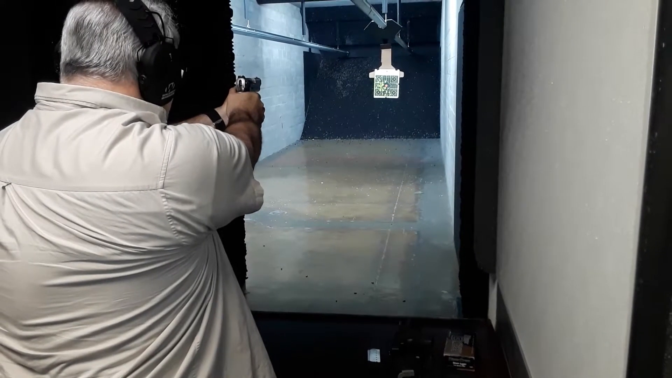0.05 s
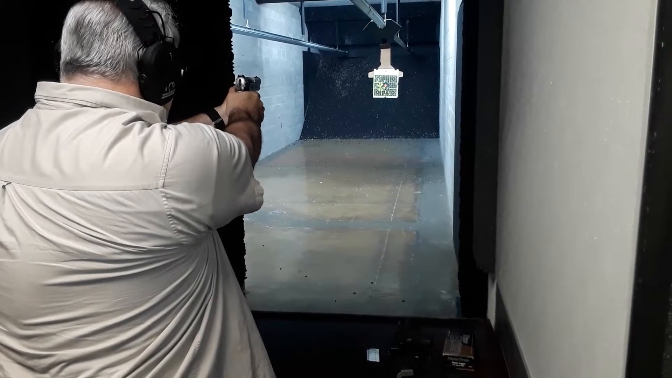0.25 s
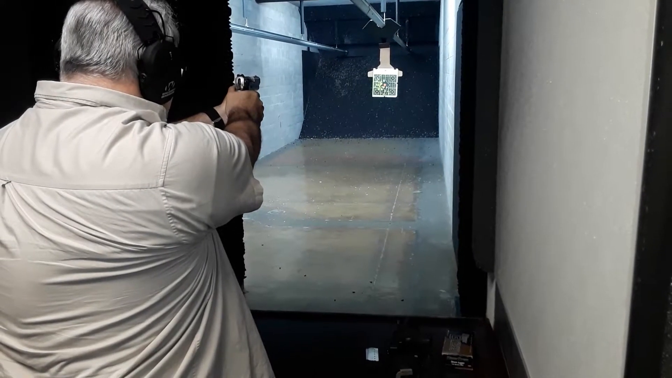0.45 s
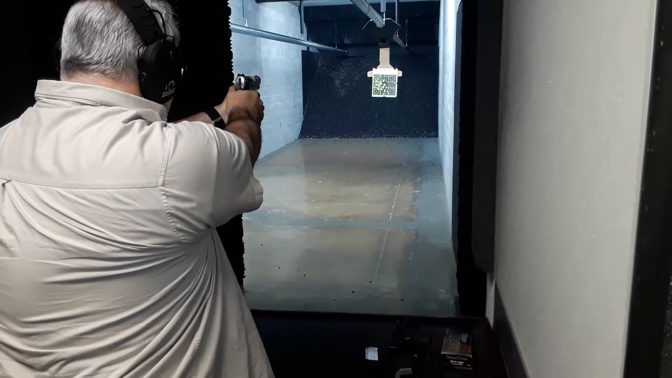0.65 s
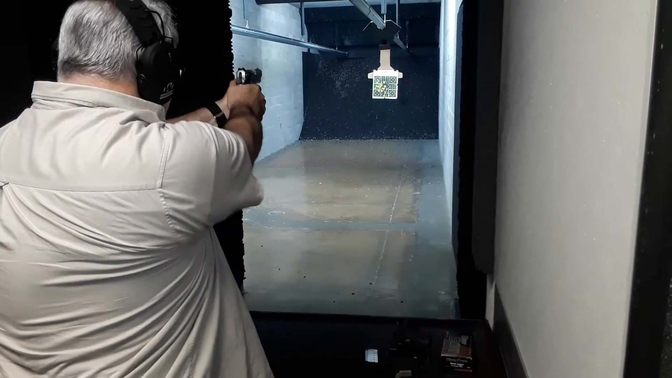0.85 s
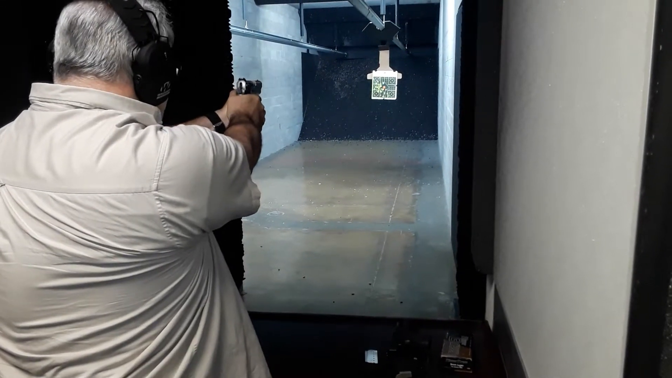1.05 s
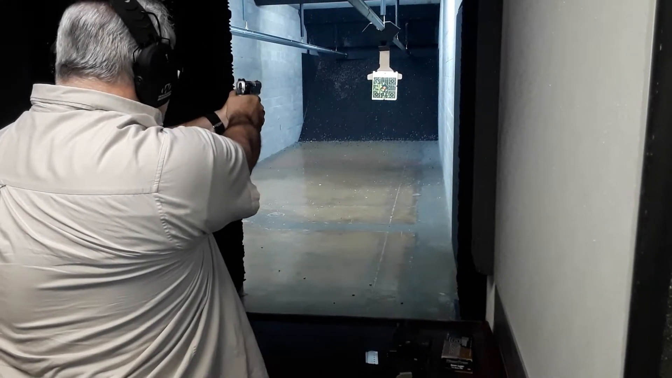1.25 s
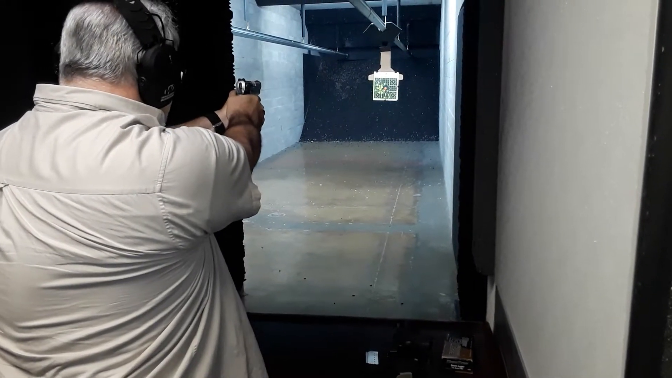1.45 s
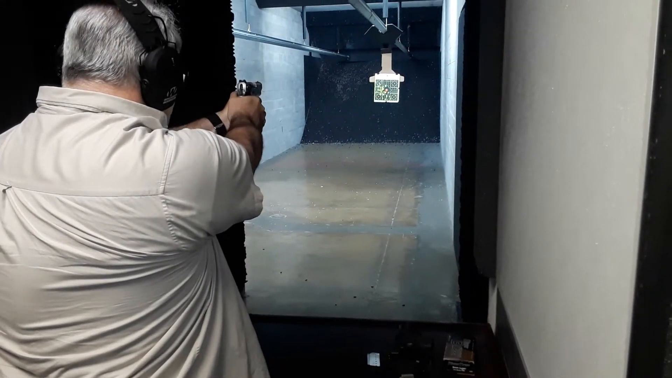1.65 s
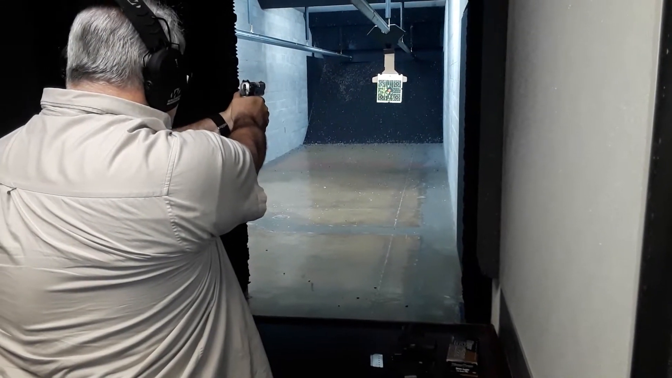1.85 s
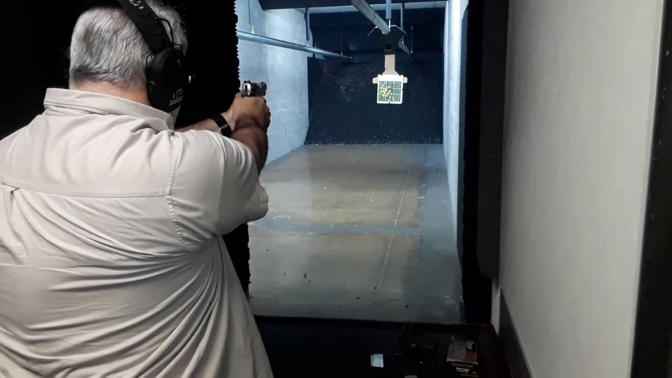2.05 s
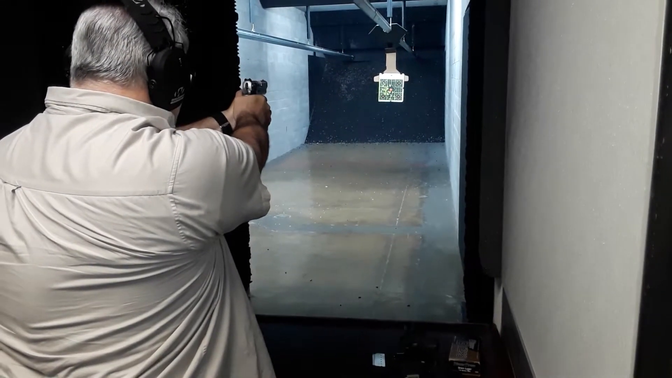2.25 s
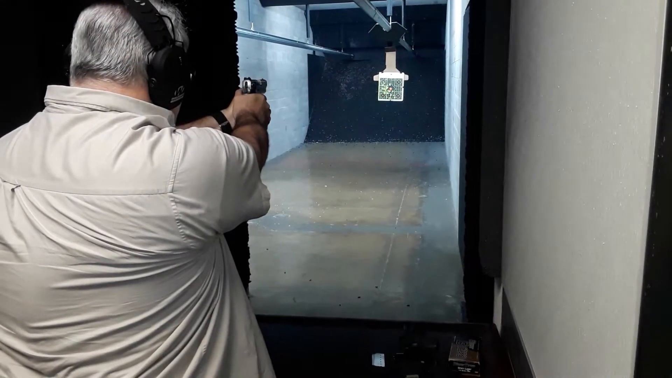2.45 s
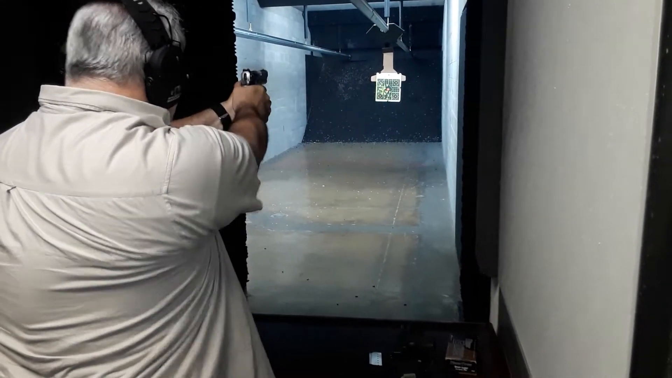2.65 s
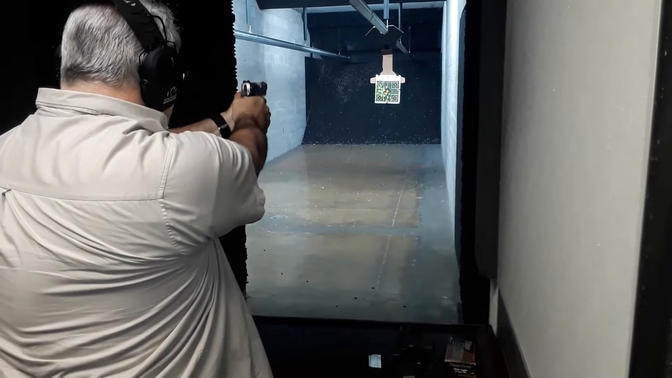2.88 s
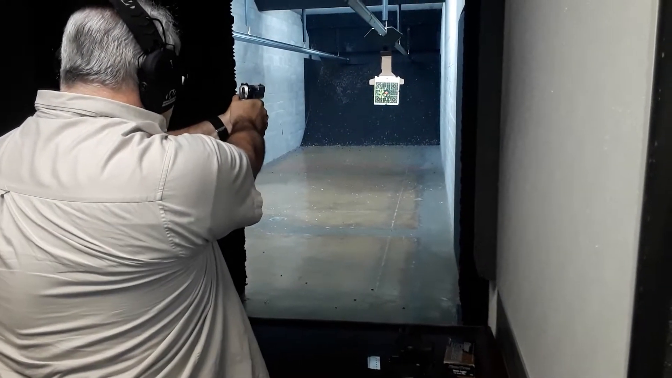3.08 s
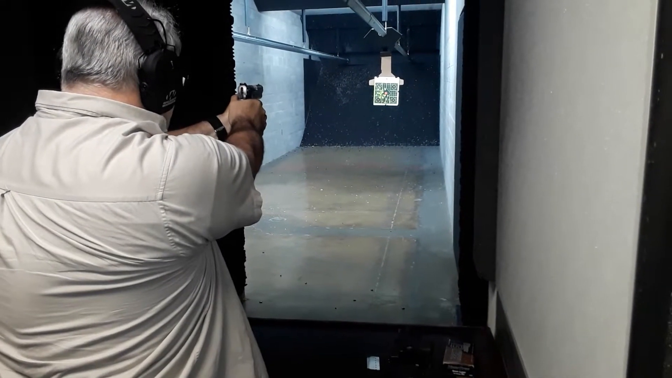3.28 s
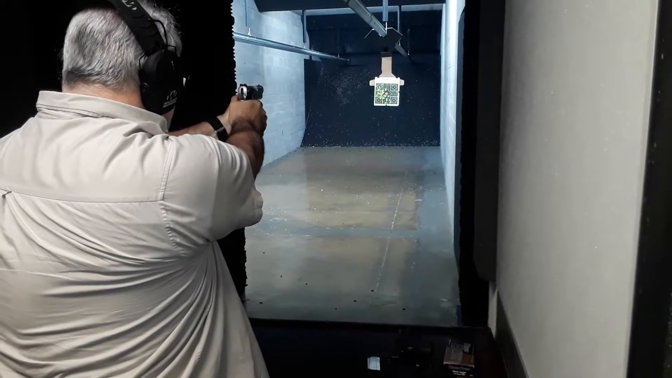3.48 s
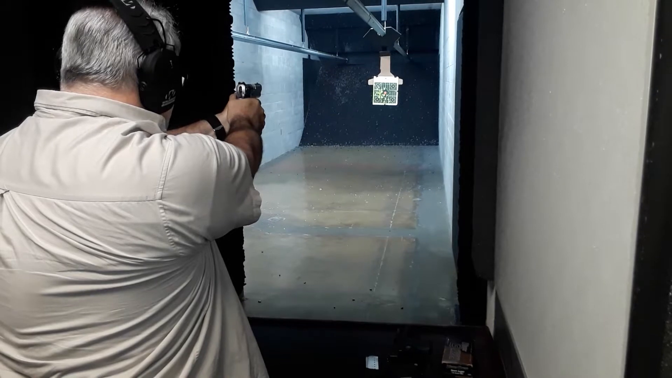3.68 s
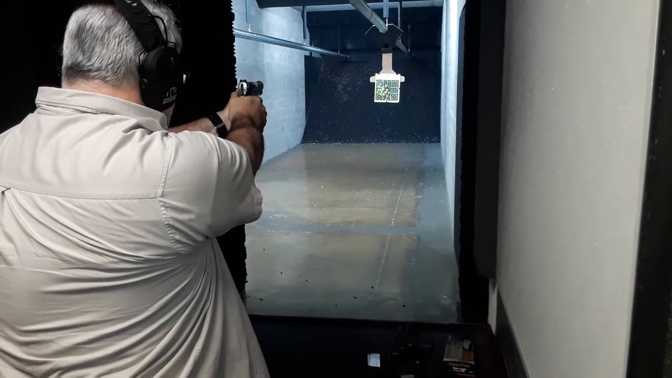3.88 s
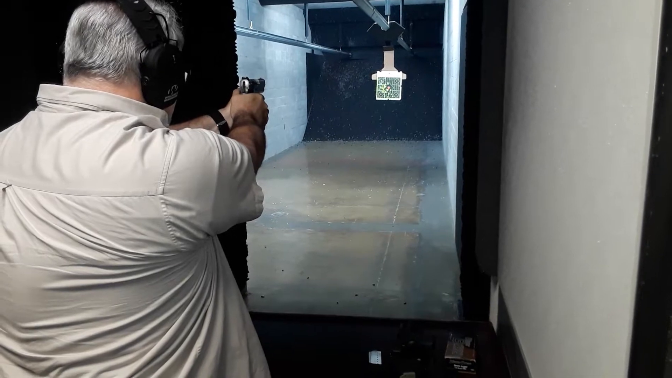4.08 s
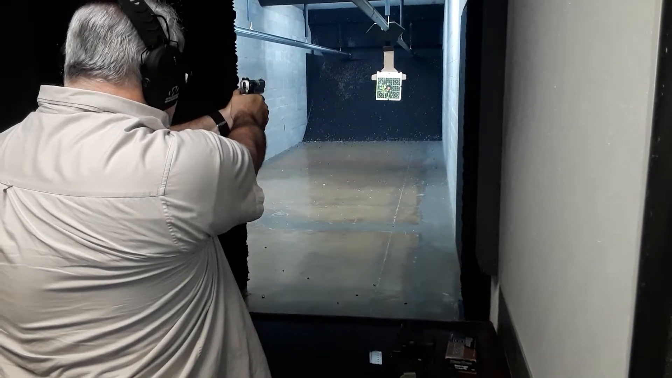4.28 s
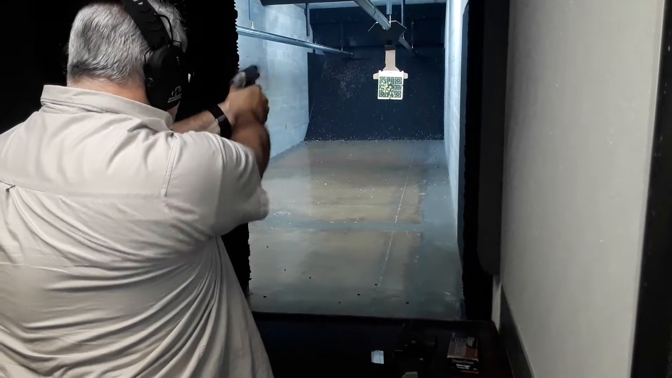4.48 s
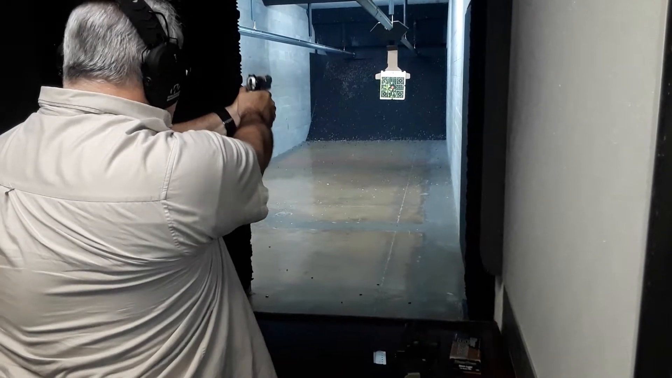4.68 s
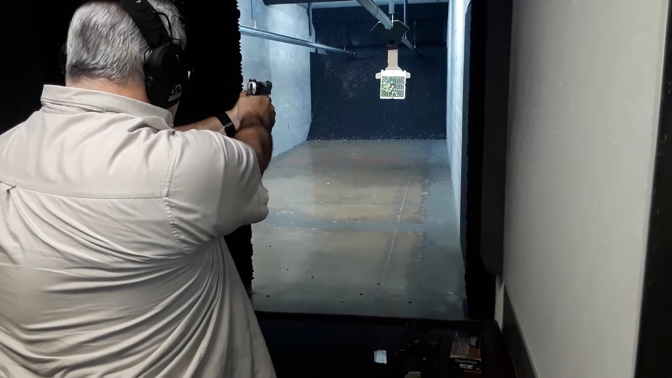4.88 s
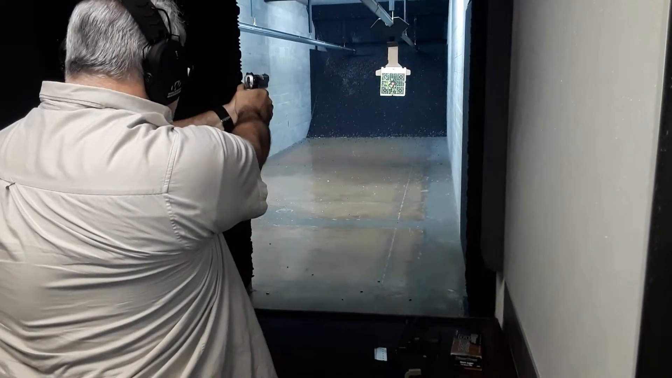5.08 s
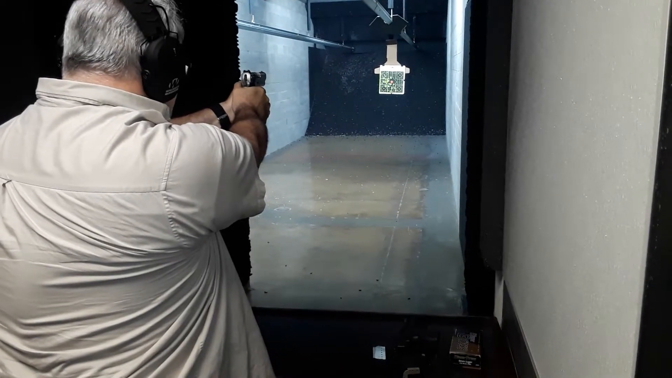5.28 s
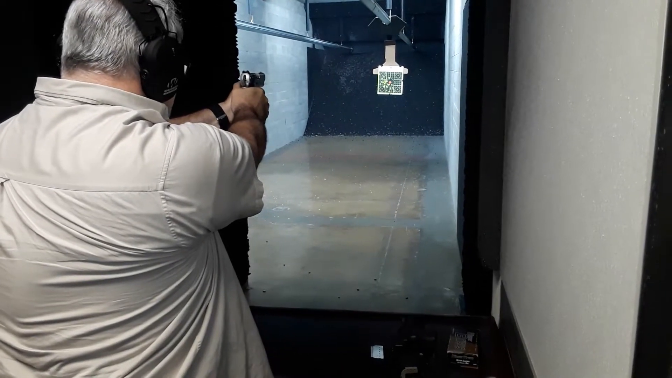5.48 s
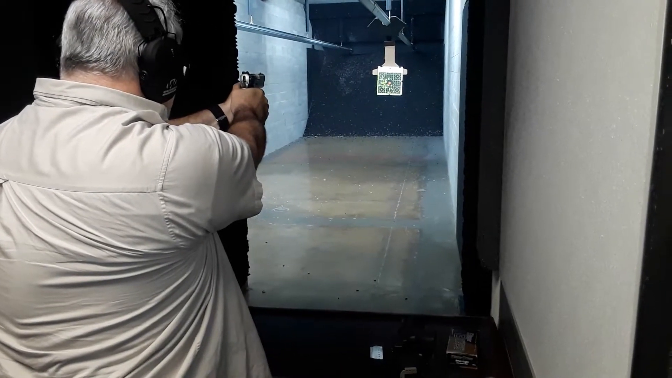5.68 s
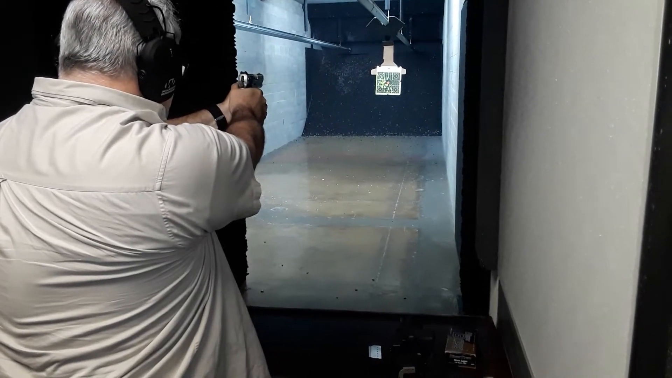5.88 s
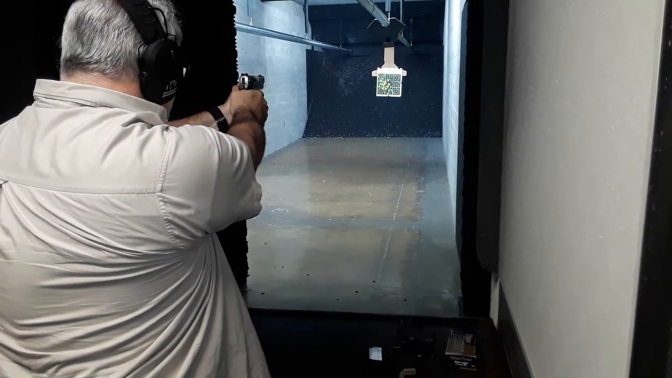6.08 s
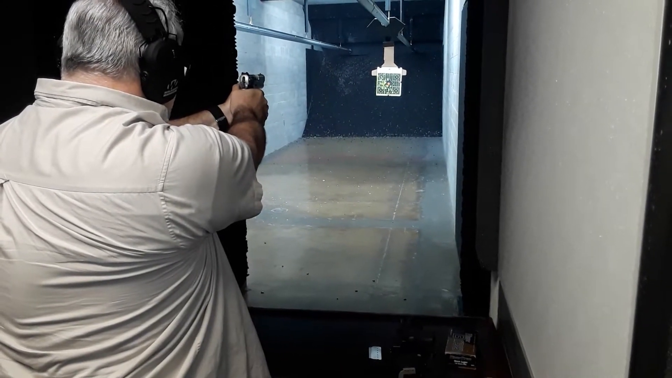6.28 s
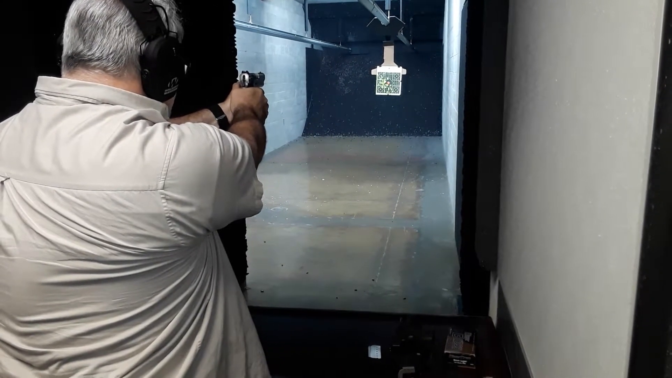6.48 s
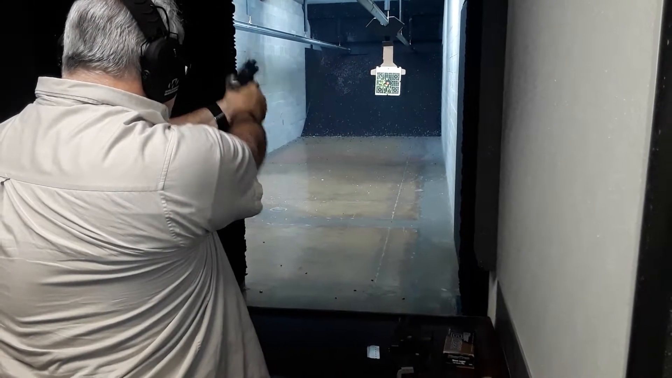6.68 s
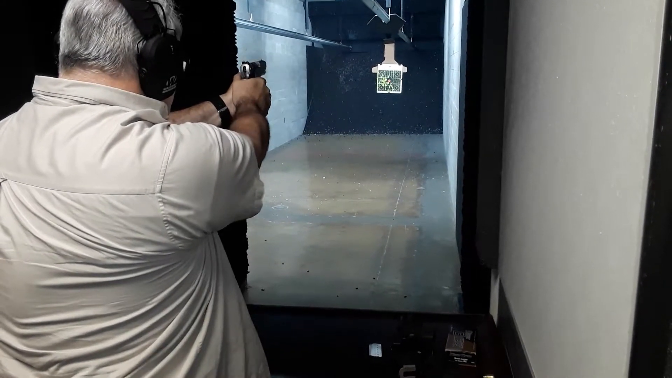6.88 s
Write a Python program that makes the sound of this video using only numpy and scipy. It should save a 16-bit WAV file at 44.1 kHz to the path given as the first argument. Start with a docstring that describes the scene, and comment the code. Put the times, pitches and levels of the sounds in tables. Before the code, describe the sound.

A handgun fires four spaced shots, each echoing down a concrete shooting lane, with small casing clinks and rushing ventilation.

```python
"""Indoor range, microphone in the booth just behind the shooter: four pistol shots over loud ventilation.
Each blast cracks in the booth, then the long concrete lane swells, booms back and flutters.
Spent brass tinkles as it lands, and something knocks on a bench. The shots overload the microphone,
and its gain control holds the ventilation down for over a second after each one."""
import sys
import numpy as np
from scipy import signal
from scipy.fft import rfft, irfft, next_fast_len
from scipy.io import wavfile
from scipy.ndimage import uniform_filter1d, minimum_filter1d

SR = 44100
rng = np.random.default_rng(int(sys.argv[2]) if len(sys.argv) > 2 else 0)


def output_pcm(signal):
    """Save a mono or channel-first signal as 16-bit PCM at the path in sys.argv[1].

    Samples are clipped to [-1, 1] before scaling.
    """
    pcm = np.clip(np.atleast_2d(signal).T, -1, 1) * 32767
    wavfile.write(sys.argv[1], SR, np.round(pcm).astype(np.int16))


N = 305613
TIME = np.arange(N) / SR
AGE = TIME[:2 ** 16]  # seconds since the start of one event

# stereo width of the room: f/Hz, side minus mid/dB
ROOM_WIDTH = [(60, -18.5), (130, -29.5), (220, -17.5), (400, -6.5), (700, -10), (1300, -1.5), (2400, -1),
              (4400, -2), (15000, 1)]


def undb(db):
    """Decibels to gain."""
    return 10 ** (np.asarray(db) / 20)


def lookup(table, hz):
    """A table's level in dB, read on a log-frequency axis."""
    rows = np.array(table)
    return np.interp(np.log(np.maximum(hz, 1)), np.log(rows[:, 0]), rows[:, 1])


def bins(size):
    """Frequencies of a spectrum of this many samples."""
    return np.fft.rfftfreq(size, 1 / SR)


def noise(table, size):
    """Unrelated noise for each channel, coloured by a table of f/Hz, density/dB."""
    white = rfft(rng.standard_normal((2, size)))
    return irfft(white * undb(lookup(table, bins(size))) * np.sqrt(SR / 2), size)


def diffuse(pair):
    """Two noises become one room sound: alike in the bass, unrelated in the treble."""
    size = pair.shape[1]
    width = undb(lookup(ROOM_WIDTH, bins(size)))
    mid, side = rfft(pair)
    return irfft(np.array([mid + width * side, mid - width * side]) / np.sqrt(1 + width ** 2), size)


def level(x, db):
    """Set the rms level."""
    return x * undb(db) / np.sqrt(np.mean(x ** 2))


def fade(t, t60):
    """Exponential decay, 60 dB in t60 seconds."""
    return np.exp(-np.log(1000) * t / t60)


def hump(hz, centre_hz, octaves):
    """A bell on the log-frequency axis, 1 at its centre."""
    return np.exp(-(np.log2(hz / centre_hz) / octaves) ** 2)


def add(out, s, sound):
    """Mix a sound in at s seconds."""
    start = int(s * SR)
    out[:, start:start + sound.shape[-1]] += sound[..., :N - start]


def ventilation(level_db=-26.5, waver_db=0.31):
    """Air rushes through resonant ducts and wavers a little."""
    # colour of the rushing air: f/Hz, relative density/dB
    air_colour = [(28, -18.5), (45, -19), (62, -15), (100, -3.5), (180, -2), (520, -14), (1800, -13),
                  (4100, -35.5), (5100, -37), (6200, -44.5), (8300, -45.5), (9600, -56), (11500, -55),
                  (15500, -61)]
    # duct resonances: f/Hz, width/Hz, lift/dB
    ducts = [(234.5, 49, 7), (339, 39, 8), (1003, 19, 3.5), (1230, 50, 1.5), (1784, 25, 5)]
    size = next_fast_len(N)
    lift_db = sum(db / (1 + (2 * (bins(size) - hz) / width) ** 2) for hz, width, db in ducts)
    rush = diffuse(noise(air_colour, size))
    air = irfft(rfft(rush) * undb(lift_db), size)[:, :N]
    waver = level(uniform_filter1d(rng.standard_normal(N), size=4000), 0)
    return level(air, level_db) * undb(waver_db * waver)


def brass(tick_t60=0.044, tumble_hz=14, tumble_depth=.4):
    """Each spent case ticks on contact, then rings like a tiny bell, swinging about as it tumbles."""
    # cases landing: t/s, ring f/Hz, ring level/dB, tick level/dB
    landings = [(.394, 7950, -64, -45), (.409, 10030, -43, -66), (.612, 10030, -51, -72),
                (.672, 7340, -49, -68), (2.984, 7260, -43, -35), (3.205, 7300, -46, -66),
                (4.7584, 7200, -23.5, -13.5), (4.768, 7160, -24, -17), (5.965, 7200, -51, -52)]
    # modes of a case: multiple of its ring frequency, level/dB, t60/s
    case_modes = [(1, -6, .3), (1.003, -15.5, .25), (1.6, -20, .16)]
    # colour of the contact tick: f/Hz, relative density/dB
    tick_colour = [(1500, -13), (4800, 5), (6500, 0), (11000, -12.5), (14500, -3), (16000, -12)]
    out = np.zeros((2, N))
    for s, hz, ring_db, tick_db in landings:
        ring = sum(undb(db) * np.sin(2 * np.pi * (hz * ratio * AGE + rng.random((2, 1)) / 2))
                   * fade(AGE, t60) for ratio, db, t60 in case_modes)
        turns = tumble_hz * rng.uniform(1, 1.8) * AGE + rng.random((2, 1))
        tumble = 1 + tumble_depth * np.sin(2 * np.pi * turns)
        tick = level(noise(tick_colour, len(AGE)), tick_db) * fade(AGE, tick_t60)
        add(out, s, undb(ring_db) * ring * tumble + tick)
    return out


def muzzle(blast_db=18, blast_s=0.001224, crack_t60=0.28, slap_t60=0.075):
    """Close up: a pressure pulse and its slow rebound, a crack off the booth, slaps off near surfaces."""
    # colour of the crack in the booth: f/Hz, density/dB
    crack_colour = [(25, -54), (90, -28), (350, -25.5), (700, -23.5), (1500, -23), (2800, -27),
                    (5600, -37.5), (8200, -42.5), (10000, -51.5), (12500, -42), (16000, -44)]
    # single reflections of the crack: delay/s, level/dB
    slaps = [(.021, 6), (0.101, -8)]
    blast = -(1 - AGE / blast_s) * np.exp(-AGE / blast_s)
    slap_power = sum((undb(db) * (AGE > s) * fade(abs(AGE - s), slap_t60)) ** 2 for s, db in slaps)
    crack = noise(crack_colour, len(AGE)) * np.sqrt(fade(AGE, crack_t60) ** 2 + slap_power)
    return undb(blast_db) * blast + crack


def lane_envelope(hz, bass_corner_hz=166, air_corner_hz=18000, far_end_s=0.11):
    """Reflections build up and die away; the far end sends a second, boomy wave back."""
    wall_t60 = .56 + 0.43 / (1 + (hz / bass_corner_hz) ** 2)  # the walls absorb less bass
    t60 = wall_t60 / (1 + (hz / air_corner_hz) ** 2)  # the air absorbs the top
    # the build-up is quicker in the treble, slowest in a midrange swell
    build_s = 0.036 / np.hypot(1, hz / 3200) + 0.043 * hump(hz, centre_hz=844, octaves=0.77)
    echo_db = -10.5 + 11 * hump(hz, centre_hz=193, octaves=.55)
    echo_age = np.maximum(AGE - far_end_s, 0)
    first, echo = ((1 - np.exp(-(t / build_s) ** 2)) * fade(t, t60) for t in (AGE, echo_age))
    return np.hypot(first, undb(echo_db) * echo)


def lane(modes_db=-1, phase_spread=.4):
    """The concrete lane answers a blast with dense reflections and standing waves."""
    # colour of the reverberation: f/Hz, density/dB
    reverb_colour = [(35, -51), (65, -26), (108, -16), (200, -15.5), (330, -17.5), (720, -11.5),
                     (1260, -13.5), (2500, -24), (4700, -38), (8300, -42), (10000, -46), (14400, -48)]
    # standing waves: f/Hz, level/dB
    standing_waves = [(118, -4), (140, -5), (170, -6), (193, 2.5), (228, -0.5), (322, -11.5), (366, 3),
                      (466, 8), (525, -5), (584, 7), (620, 4), (727, 10), (823, -2.5), (950, 11), (1037, 2),
                      (1134, 6), (1232, 1), (1317, 2), (1627, -2)]
    spectrum = rfft(diffuse(noise(reverb_colour, len(AGE))))
    octave = np.log2(np.maximum(bins(len(AGE)), 1))
    out = 0
    for centre in np.arange(4.5, 14.6, .5):  # half-octave bands
        band = irfft(spectrum * np.maximum(1 - 2 * abs(octave - centre), 0))
        # the reflected energy arrives evenly over spans longer than a few round trips
        power = uniform_filter1d(np.mean(band ** 2, axis=0), size=3000, mode="wrap")
        out = out + band * np.sqrt(power.mean() / power) * lane_envelope(2 ** centre)
    for hz, db in standing_waves:
        width = undb(lookup(ROOM_WIDTH, hz))
        phase = rng.uniform(0, 2 * np.pi) + phase_spread * width * rng.standard_normal((2, 1))
        out = out + undb(db + modes_db) * np.sin(2 * np.pi * hz * AGE + phase) * lane_envelope(hz)
    return out


def flutter_echo(round_trip_hz=52.53, t60=2.28, build_s=.08, uneven_db=2):
    """Sound trapped between parallel walls repeats on every round trip and outlasts the boom."""
    # colour of the flutter: f/Hz, harmonic level/dB
    colour = [(50, -54.5), (105, -18.5), (160, -20), (260, -26.5), (360, -19.5), (500, -32.5), (725, -23),
              (1030, -39), (1250, -23.5), (1600, -40), (2550, -42), (3000, -48.5), (3450, -43.5),
              (4500, -58.5)]
    period = int(round(SR / round_trip_hz))
    hz = bins(period)
    in_band = (hz > 0) & (hz < colour[-1][0])
    harmonics = undb(lookup(colour, hz) + uneven_db * rng.standard_normal(len(hz))) * in_band
    width = undb(lookup(ROOM_WIDTH, hz))
    phase = 2 * np.pi * rng.random(len(hz)) + width * rng.standard_normal((2, len(hz)))
    trip = irfft(harmonics * np.exp(1j * phase), period) * period / 2
    repeats = trip[:, np.arange(len(AGE)) % period]
    return repeats * (1 - np.exp(-AGE / build_s)) * fade(AGE, t60)


def wall_thump(delay_s=.032, build_s=0.017, t60=0.16):
    """The near walls answer the blast with a short low thump, higher than the boom that follows."""
    # modes of the thump: f/Hz, level/dB
    modes = [(238, 16.9), (322, 15.9)]
    t = np.maximum(AGE - delay_s, 0)
    ring = sum(undb(db) * np.sin(2 * np.pi * hz * t) for hz, db in modes)
    return ring * (1 - np.exp(-(t / build_s) ** 2)) * fade(t, t60)


def pistol():
    """Every shot has its own crack but excites the same lane."""
    # shots: t/s, strength/dB
    shots = [(0.7253, 0.5), (2.5476, 1.1), (4.461, 0.5), (6.6855, 0.5)]
    out = np.zeros((2, N))
    room = lane() + flutter_echo() + wall_thump()
    for s, db in shots:
        add(out, s, undb(db) * (muzzle() + room))
    return out


def bench(contact_s=0.00052, scatter_db=-27, scatter_t60=0.11, click_db=-33, click_t60=0.054):
    """Something bounces on a board; the hollow knock and faint click scatter off the booth walls."""
    # the knock and its bounces: t/s, level/dB
    knocks = [(5.958, -14), (5.9605, -11), (5.9677, -25), (5.973, -31), (5.979, -27)]
    # modes of the board: f/Hz, level/dB, t60/s
    board_modes = [(730, -7, 0.041), (807, -4, 0.028), (900, -1.5, 0.031), (1010, 5.5, 0.017),
                   (1313, 2.5, 0.023), (1580, -4.5, 0.039), (1850, -7, 0.036), (2040, -19, .025),
                   (3430, -17, 0.012)]
    out = np.zeros((2, N))
    ring = sum(undb(db) * np.sin(2 * np.pi * hz * AGE) * fade(AGE, t60) for hz, db, t60 in board_modes)
    ring *= 1 - np.exp(-AGE / contact_s)  # soft contact
    for s, db in knocks:
        click = undb(click_db) * rng.standard_normal((2, len(AGE))) * fade(AGE, click_t60)
        add(out, s, undb(db) * (ring + click))
    walls = undb(scatter_db) * rng.standard_normal((2, len(AGE))) * fade(AGE, scatter_t60)
    return out + signal.fftconvolve(out, walls, axes=-1)[:, :N]


def scene():
    """Shots, brass and bench over the ventilation, reaching the right channel two samples late."""
    left, right = pistol() + brass() + bench() + ventilation()
    return np.array([left, np.pad(right, (2, 0))[:N]])


def gain_control(x, ceiling_db=-3, hold_s=1.049, recover_s=0.12, start_db=-2.5):
    """Peaks pull the gain down at once; it holds, then recovers, fast at first. It starts a little low."""
    peak_db = 20 * np.log10(abs(x).max(axis=0) + 1e-9)
    wanted_db = np.minimum(ceiling_db - peak_db, 0)
    half_hold = int(hold_s * SR / 2)
    held_db = minimum_filter1d(wanted_db, 2 * half_hold + 1, origin=half_hold, mode="constant")
    recovery = np.exp(-TIME / recover_s)
    gain_db = np.minimum(np.minimum.accumulate(held_db / recovery), start_db) * recovery
    return x * undb(gain_db)


def record(dry, overload_db=12, low_cut_hz=62, smear_hz=900, balance_db=-1.04, top_hz=15900):
    """The microphone overloads, the gain ducks, and a phase shift and low cut round the flat peaks."""
    squashed = dry / np.sqrt(np.hypot(1, (dry / undb(overload_db)) ** 2))
    pole = np.exp(-2 * np.pi * smear_hz / SR)
    out = signal.lfilter([pole, -1], [1, -pole], gain_control(squashed))  # all-pass
    out = signal.sosfilt(signal.butter(2, low_cut_hz, "high", fs=SR, output="sos"), out)
    balance = undb(np.array([[balance_db], [-balance_db]]) / 2)
    out = np.clip(out * balance, -1, 1)
    return signal.sosfilt(signal.ellip(10, .1, 70, top_hz, fs=SR, output="sos"), out)


dry = scene()
out = record(dry)
output_pcm(out)
```